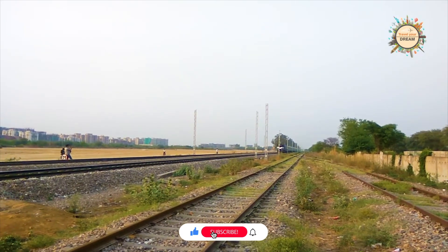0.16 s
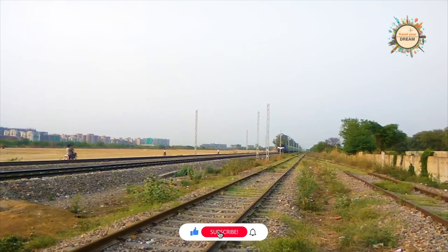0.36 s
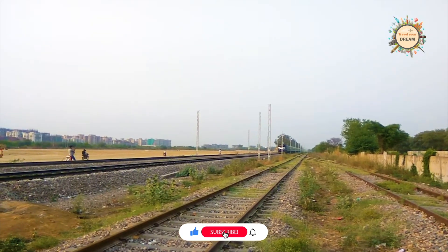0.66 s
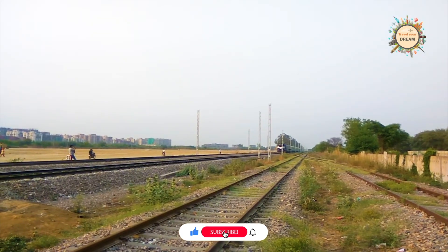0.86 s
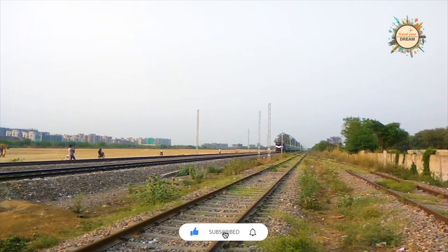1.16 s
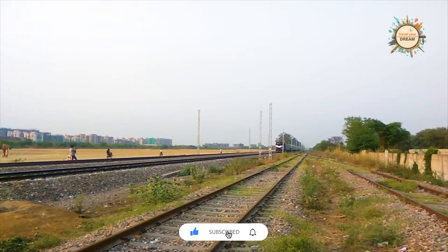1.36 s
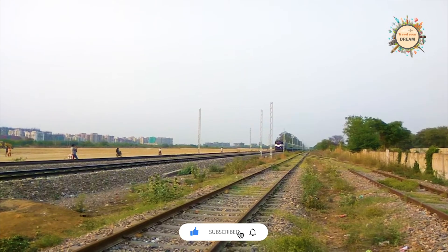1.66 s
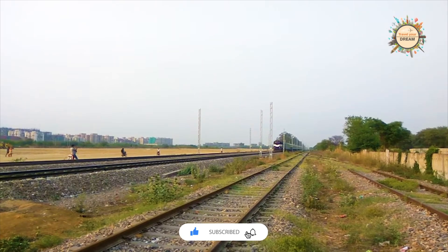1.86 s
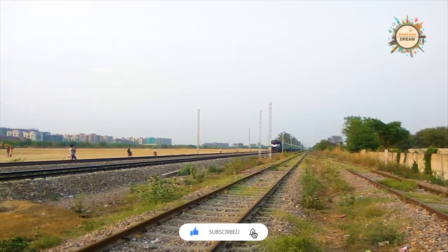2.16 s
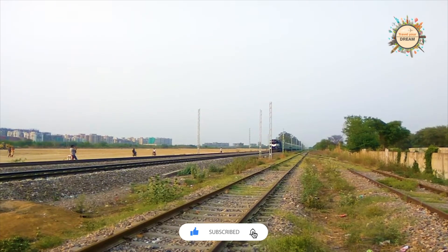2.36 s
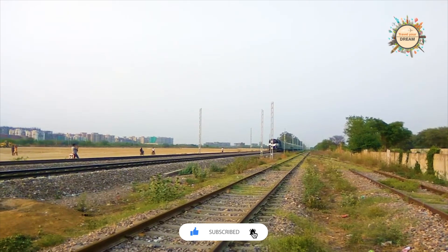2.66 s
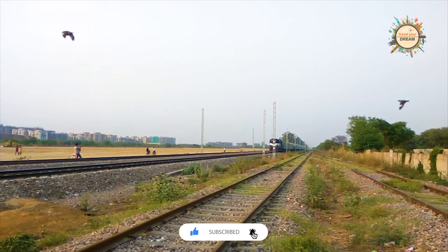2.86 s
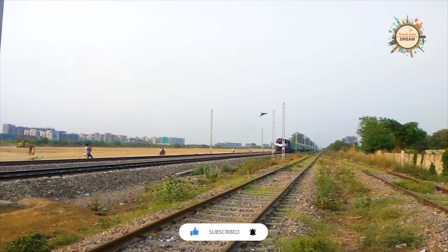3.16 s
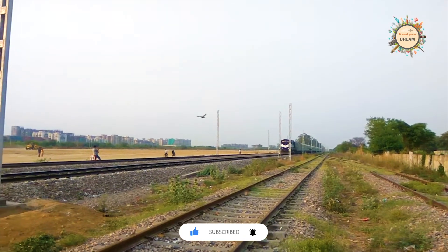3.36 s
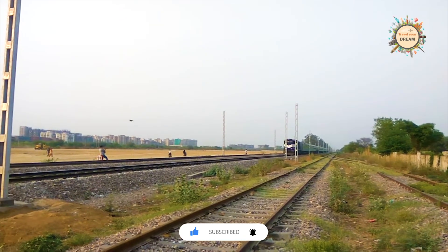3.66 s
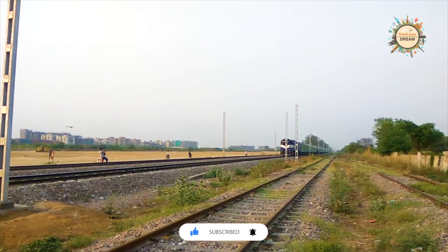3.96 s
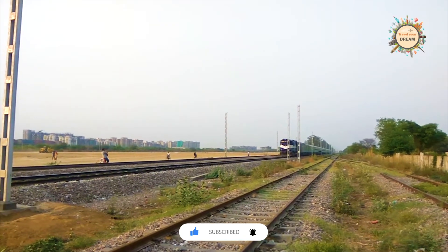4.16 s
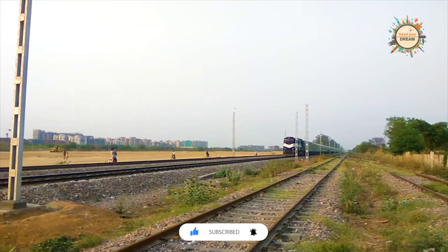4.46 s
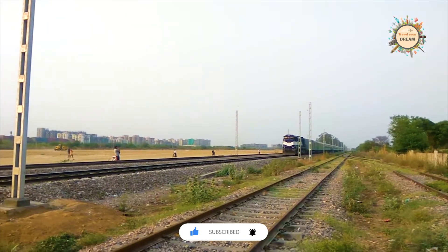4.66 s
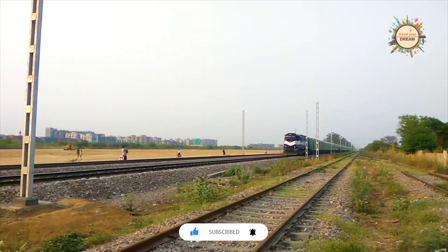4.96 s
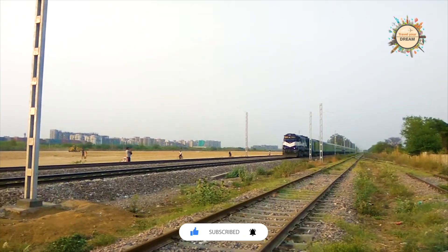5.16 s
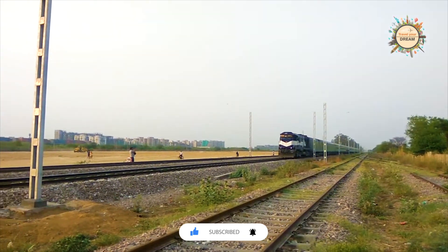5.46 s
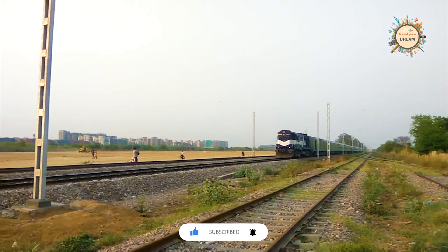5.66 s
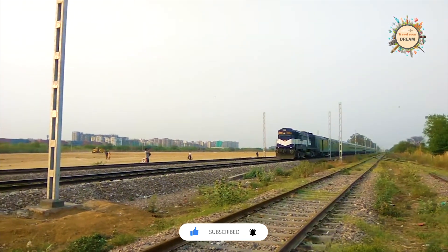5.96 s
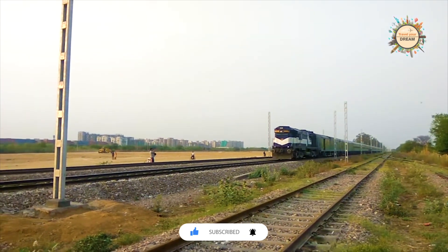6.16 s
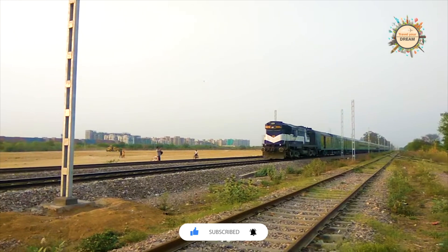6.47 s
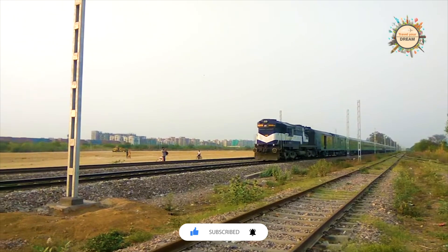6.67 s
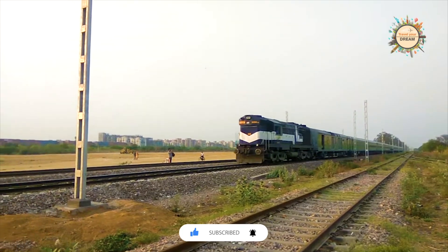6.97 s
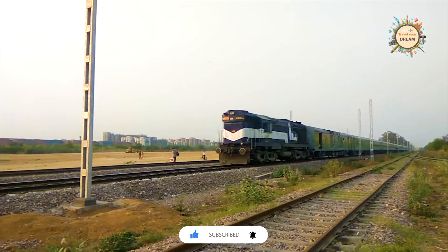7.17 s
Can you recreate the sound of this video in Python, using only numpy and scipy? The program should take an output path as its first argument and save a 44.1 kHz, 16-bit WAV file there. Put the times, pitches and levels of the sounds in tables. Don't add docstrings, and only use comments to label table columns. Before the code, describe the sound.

Quiet open trackside heard by a stereo phone with softened treble. From 0 s, a faint low diesel drone around 80 Hz flutters unevenly over soft rolling rumble, while brief high bird trills and chirps come and go until about 4.3 s. A distant single-note horn, thin and wavering, drifts in from about 0.7 to 3.9 s. One faint wheel knock sounds near 2.7 s. At 4.5 s a loud reedy air horn bursts in, joined at 4.7 s by a lower one a tritone below; the harsh, buzzing, dissonant pair holds with slight shimmer until 6.6 s, stopping abruptly with a short scattered echo. The engine throb has strengthened by then. Rumble and rail roar rise quickly from 6.7 s; from 6.9 s to the end at 7.3 s, hard metallic knocks with dull thuds strike irregularly, and compressed air hisses in, spitting slightly.

```python
import sys
import numpy as np
from scipy import signal
from scipy.fft import rfft, irfft
from scipy.io import wavfile
from scipy.ndimage import uniform_filter1d

SR = 44100
rng = np.random.default_rng(int(sys.argv[2]) if len(sys.argv) > 2 else 0)


def how_loud(loudness_db):
    steps = np.asarray(loudness_db, float) / 20
    return 10 ** steps


def unload_audio(sound):
    columns = np.transpose(np.atleast_2d(sound))
    steps = np.round(np.clip(columns, -1, 1) * 32767)
    wavfile.write(sys.argv[1], SR, steps.astype(np.int16))


N = 321930
T = np.arange(N) / SR
FIRING_HZ = 80.7
FAR_HORN_HZ = 349.6

# time_s, pitch_hz
HIGH_HORN_PITCH = [
    (4.55, 463.3), (4.58, 458.5), (4.63, 456.6), (4.72, 454.5), (5, 455.7), (5.3, 454.8),
    (5.6, 455.1), (5.9, 454), (6.2, 454.4), (6.5, 453)]
LOW_HORN_PITCH = [
    (4.738, 324.6), (4.8, 322.7), (5, 322.5), (5.3, 321.9), (5.6, 320.8), (5.9, 320.7),
    (6.2, 319.5), (6.5, 319.4), (6.64, 321.6), (6.68, 323)]
# time_s, note_db, second_db, third_db, upper_db
HIGH_HORN_LEVELS = [(4.53, -33, -31, -40, -51), (4.545, -25.5, -26, -27, -41.5),
                    (4.56, -24, -20.5, -24, -29.5), (4.6, -24, -22.5, -25.5, -29.5),
                    (4.68, -23.5, -16, -28, -24.5), (4.78, -20.5, -18.5, -24.5, -26),
                    (4.88, -22, -17, -27, -28), (4.98, -22.5, -17.5, -29.5, -27.5),
                    (5.08, -19.5, -19.5, -25.5, -26), (5.18, -20.5, -19.5, -25, -26),
                    (5.28, -18.5, -17, -38, -26), (5.38, -19.5, -18, -24.5, -27),
                    (5.48, -21, -19.5, -29, -27), (5.58, -19, -17, -30.5, -26),
                    (5.68, -22, -20, -26.5, -25), (5.78, -23, -22, -23, -24.5), (5.88, -20, -22, -30, -23),
                    (5.98, -24, -21, -22.5, -24), (6.08, -28, -21, -21.5, -24.5),
                    (6.18, -24, -17, -26, -26.5), (6.28, -31.5, -25, -20.5, -24),
                    (6.38, -23.5, -25, -22.5, -27.5), (6.48, -31.5, -24.5, -22.5, -24),
                    (6.58, -31.5, -26.5, -21, -25), (6.6, -26, -30, -21.5, -25),
                    (6.62, -31, -46, -39, -36.5), (6.65, -48, -43.5, -46, -48), (6.68, -58, -49, -45, -56)]
LOW_HORN_LEVELS = [(4.68, -45, -46, -42, -53.5), (4.71, -37.5, -50, -47, -46.5),
                   (4.74, -27.5, -34.5, -36, -47.5), (4.769, -22, -27.5, -23, -36),
                   (4.81, -23.5, -24.5, -24.5, -30.5), (4.9, -22.5, -25.5, -26.5, -38),
                   (5.01, -23.5, -24, -23.5, -34.5), (5.12, -21.5, -24, -24, -30.5),
                   (5.23, -23.5, -27, -26.5, -39), (5.341, -21.5, -24.5, -24.5, -36),
                   (5.45, -20.5, -27.5, -25, -33), (5.56, -21, -25, -24.5, -32),
                   (5.669, -19, -26, -25.5, -38.5), (5.78, -20, -25, -24, -33.5),
                   (5.891, -21.5, -28, -29.5, -41), (6.0, -21, -25, -25, -33),
                   (6.11, -19.5, -26.5, -31.5, -34), (6.22, -16.5, -29, -28, -31.5),
                   (6.33, -14.5, -28.5, -26.5, -34.5), (6.44, -15.5, -34.5, -27, -28.5),
                   (6.55, -16, -28, -27, -28.5), (6.6, -14.5, -26, -26, -33), (6.629, -17, -44, -43, -45),
                   (6.659, -25, -59, -50, -42), (6.7, -41, -58, -51.5, -56), (6.74, -49, -51, -60, -57)]
HIGH_HORN_BELL = [-8.5, -7.5, -7.5, -11, -9, -17, -13, -17, -17.5, -20.5, -24, -34.5, -40, -46, -48, -43,
                  -42.5, -51.5]
LOW_HORN_BELL = [-0.5, 2.5, -9, -12, -11.5, -18, -13, -17, -12, -24, -18.5, -19, -28, -32.5, -29.5, -33,
                 -27.5, -37.5]
# time_s, level_db
EXHAUST_LEVELS = [(0.0, -48), (0.04, -37.5), (0.08, -47.5), (0.36, -49), (0.43, -41), (0.61, -47.5),
                  (0.73, -40), (0.77, -59), (0.91, -43), (1.22, -54), (1.26, -39), (1.38, -51), (1.42, -35),
                  (1.61, -45), (1.85, -37.5), (2.03, -54), (2.09, -37), (2.88, -37), (2.91, -43.5),
                  (3.36, -42), (3.39, -56), (3.5, -36), (3.84, -39), (3.94, -33.5), (4.33, -34.5),
                  (4.37, -46), (4.41, -33), (4.47, -38.5), (4.51, -33), (4.78, -46.5), (4.84, -42.5),
                  (4.94, -53.5), (5.0, -44.5), (5.08, -47), (5.26, -33.5), (5.47, -40.5), (5.71, -49),
                  (5.75, -35), (5.81, -32), (5.9, -54.5), (5.94, -39), (6.08, -33.5), (6.12, -39),
                  (6.22, -28), (6.32, -32), (6.4, -25.5), (6.44, -34.5), (6.51, -28.5), (6.57, -34),
                  (6.65, -33.5), (6.69, -47), (6.77, -28.5), (6.85, -37.5), (6.91, -27), (7.01, -27.5),
                  (7.05, -39.5), (7.14, -27.5), (7.3, -38.5)]
CYLINDER_LEVELS = [0, -6, -0.5, -6]
# time_s, rumble_db, rail_roar_db, hiss_db, leaves_db
GEAR_BEFORE_HORNS = [
    (0.0, -50, -53.5, -60, -75.5), (0.25, -50.5, -52, -60.5, -75), (0.43, -53.5, -54.5, -61.5, -72),
    (0.56, -48.5, -54, -60.5, -70.5), (0.71, -46.5, -51, -61, -72.5), (0.91, -49, -55, -63, -74),
    (1.14, -46.5, -55, -58.5, -71), (1.27, -47, -52, -57.5, -71.5), (1.34, -46, -54.5, -59, -70.5),
    (1.48, -46.5, -53, -61, -70), (1.68, -47, -53.5, -59.5, -78.5), (1.84, -48.5, -53.5, -59.5, -74.5),
    (2.07, -48.5, -55.5, -60.5, -77), (2.24, -47, -53.5, -58.5, -78), (2.52, -51, -55.5, -65, -77),
    (2.68, -49, -51, -58.5, -71.5), (2.84, -50.5, -53, -59, -69.5), (3.03, -48.5, -52, -61.5, -70.5),
    (3.57, -49, -55, -61, -67.5), (3.71, -49.5, -55.5, -59, -73), (3.97, -45.5, -52, -55.5, -70.5),
    (4.14, -47, -49.5, -57.5, -67), (4.5, -48.5, -49.5, -55.5, -67.5)]
GEAR_AFTER_HORNS = [
    (6.72, -40.5, -54, -52, -69), (6.914, -42, -42.5, -51.5, -66), (7.08, -39, -38.5, -48.5, -64)]
GEAR_DRAWING_LEVEL = [(7.14, -37, -37.5, -47, -62.5), (7.26, -36.5, -35, -49, -61),
                      (7.3, -34, -41, -50.5, -62.5)]
# freq_hz, level_db
GEAR_SPECTRUM = [(25, -30), (45, -9.5), (110, -12), (200, -18), (330, -18.5), (560, -27), (880, -22.5),
                 (1200, -31), (1700, -33.5), (2800, -35.5), (3150, -40), (4700, -42), (6300, -47.5),
                 (7500, -71)]
# start_s, peak_db, ring_hz
WHEEL_KNOCKS = [
    (2.689, -40, 920),
    (6.927, -26, 828.3),
    (6.997, -19.5, 876.3),
    (7.083, -25, 920.3),
    (7.124, -21, 854),
    (7.177, -28, 829),
    (7.238, -20, 850),
]
# time_s, level_db
VENT_LEVELS = [(7.02, -50), (7.052, -56), (7.16, -37.5), (7.204, -39), (7.254, -36.5), (7.3, -36.5)]
# freq_hz, density_db_per_hz
VENT_SPECTRUM = [(880, -38.5), (1500, -2), (1830, -15), (2340, 0), (2810, -7.5), (3160, -21), (3710, -3.5),
                 (4090, -11), (5400, -1), (7040, -8), (9150, -43.5), (15500, -120)]
# time_s, level_db
FAR_HORN_LEVELS = [(0.7, -57.5), (1.05, -54), (1.14, -45), (1.62, -45), (2.07, -51.5), (2.29, -46),
                   (2.4, -49), (2.58, -81), (2.66, -55), (3.03, -65), (3.19, -49.5), (3.54, -64),
                   (3.61, -56.5), (3.9, -64.5)]
# start_s, length_s, first_hz, last_hz, level_db, trill_hz
BIRD_CALLS = [(0.024, 0.059, 3350, 3270, -65, 33), (0.229, 0.078, 4700, 4500, -61.5, 26),
              (0.421, .13, 4610, 4040, -57, 45), (0.662, 0.11, 4670, 4050, -54, 45),
              (1.089, 0.064, 4600, 4900, -60, 30), (1.2, 0.094, 4800, 4700, -64.5, 20),
              (1.22, 0.046, 3600, 3380, -66, 20), (1.3, .08, 2700, 2570, -61, 30),
              (1.397, 0.053, 5540, 4000, -63, 29), (1.806, 0.024, 6000, 4700, -62, 20),
              (1.88, 0.022, 6200, 4800, -64, 20), (2.17, 0.08, 3650, 3200, -57.5, 30),
              (2.24, 0.073, 2900, 2410, -60, 30), (2.63, .04, 5300, 4800, -65, 22),
              (2.678, .05, 3810, 3740, -54.5, 15), (2.74, 0.054, 3500, 3350, -62, 20),
              (3.05, 0.055, 5050, 4200, -59, 26), (3.063, 0.093, 4000, 3900, -61, 19),
              (3.48, .04, 4000, 3950, -64, 20), (3.3, .1, 5570, 5400, -67, 30),
              (3.902, 0.17, 2600, 2410, -63, 30), (2.5, .05, 2500, 2300, -67, 20),
              (2.079, .15, 5180, 5530, -70, 30), (.4, .04, 3500, 3440, -65, 20),
              (4.149, .09, 6170, 5470, -62, 40), (4.29, 0.046, 6500, 5530, -62, 30)]
# freq_hz, left_minus_right_db
PORT_BALANCE = [(200, 0.5), (650, -2.5), (950, -1.5), (1350, -8), (1800, 3.5), (2300, 4), (2750, -5.5),
                (3200, 4.5), (3900, 11), (4800, 7), (6500, 5.5)]
# freq_hz, left_lead_rad
PORT_PHASE = [(0, 0), (1120, 0.34), (1460, 2), (1890, 5), (2240, 7.5), (2840, 6.9), (3100, 8.5),
              (3360, 8.5), (3620, 8), (4050, 7), (5000, 8.5), (5430, 8), (6370, 8.5), (6720, 5.5)]


def set_rms(x, db):
    return x * how_loud(db) / np.sqrt(np.mean(x ** 2))


def curves(table):
    time_s, *columns = np.transpose(table)
    return [np.interp(T, time_s, c) for c in columns]


def walk(rate_hz, size=N):
    draws = rng.standard_normal(int(size * rate_hz / SR) + 2)
    steps = uniform_filter1d(np.repeat(draws, 4), 4)
    return 1.19 * np.interp(np.arange(size) * 4 * rate_hz / SR, np.arange(len(steps)), steps)


def colour(x, points):
    hz, db = np.transpose(points)
    gain_db = np.interp(np.log(np.fft.rfftfreq(N, 1 / SR) + 1), np.log(hz), db)
    return irfft(rfft(x) * how_loud(gain_db), N)


def band(x, lo_hz, hi_hz):
    return signal.sosfilt(signal.butter(2, [lo_hz, hi_hz], "band", fs=SR, output="sos"), x)


def port_gains(hz):
    balance_db = np.interp(hz, *np.transpose(PORT_BALANCE))
    lead_rad = np.interp(hz, *np.transpose(PORT_PHASE))
    half = how_loud(balance_db / 2) * np.exp(.5j * lead_rad)
    return np.array([half, 1 / half]) / np.sqrt((abs(half) ** 2 + abs(half) ** -2) / 2)


def ports(x):
    return irfft(rfft(x) * port_gains(np.fft.rfftfreq(N, 1 / SR)), N)


def horn(pitch, table, bell_db, start_s, rise_s, shimmer_db, skirt_db, air_db, off_axis_db):
    end_s = table[-1][0]
    on = (T > start_s) & (T < end_s)
    size = on.sum()
    hz = curves(pitch)[0][on]
    levels_db = [c[on] for c in curves(table)]
    partials_db = levels_db[:3] + [levels_db[3] + b for b in bell_db]
    turn = np.exp(2j * np.pi * np.cumsum(hz) / SR)
    out, partial = np.zeros((2, N)), 1
    for k, partial_db in enumerate(partials_db, 1):
        partial = partial * turn * np.exp(-.35j * k)
        height = min(k * hz[0] / 2200, 1)
        slow_db = shimmer_db * height * ((k > 3) * walk(7.005, size=size) + 0.93 * walk(35, size=size))
        slow_db -= off_axis_db * np.clip(k * hz[0] / 4000 - 1, 0, 1) * (T[on] - start_s - 1)
        fray = how_loud(skirt_db) * (0.23 + height) * (walk(250, size=size) + 1j * walk(250, size=size))
        lean = np.exp(height * (0.26 * walk(8, size=size) + .3j * walk(9.94, size=size)))
        wave = np.sqrt(2) * how_loud(partial_db + slow_db) * (1 + fray) * partial
        gains = port_gains(k * hz.mean())[:, None]
        out[:, on] += np.real(gains * wave * np.array([lean, 1 / lean]))
    air = np.zeros(N)
    air[on] = how_loud(levels_db[3] + air_db) * (1 + .4 * turn.real) * rng.standard_normal(size)
    opening = np.clip(np.minimum((T - start_s) / rise_s, (end_s - T) / 0.04), 0, 1)
    return (out + ports(band(air, 400, 3900))) * opening


def exhaust():
    rate_hz = FIRING_HZ * (1 + 0.0525 * walk(40))
    cycle = np.floor(np.cumsum(rate_hz) / SR).astype(int)
    count = N // 100
    firing_db = np.resize(CYLINDER_LEVELS, count) + 4.35 * rng.standard_normal(count)
    pulses = np.diff(cycle, prepend=0) * how_loud(firing_db)[cycle]
    boom = set_rms(band(band(pulses, 62, 105), 52, 120), 0)
    overtone = set_rms(band(band(pulses, 150, 180), 140, 190), -19.5)
    return (boom + overtone) * how_loud(curves(EXHAUST_LEVELS)[0] - 0.5)


def running_gear():
    hz, time_s, noise = signal.stft(rng.standard_normal((3, N)), SR, nperseg=1024)
    frames = np.minimum(time_s * SR, N - 1).astype(int)
    place, centres = np.log2(hz + 1), np.arange(4.5, 13.5, .5)
    flicker = np.array([(1.27 * walk(14) + .16 * octave * walk(2.97))[frames] for octave in centres])
    flicker = flicker + 0.65 * walk(4.23)[frames]
    gear = curves(GEAR_BEFORE_HORNS + GEAR_AFTER_HORNS + GEAR_DRAWING_LEVEL)
    nearing = np.array([c[frames] - c[0] for c in gear])
    gear_place = np.log2([220, 800, 2200, 6000])
    columns = []
    for flicker_db, nearing_db in zip(flicker.T, nearing.T):
        columns.append(np.interp(place, centres, flicker_db) + np.interp(place, gear_place, nearing_db))
    spectrum_hz, spectrum_db = np.transpose(GEAR_SPECTRUM)
    db = np.array(columns).T + np.interp(place, np.log2(spectrum_hz), spectrum_db)[:, None]
    share = np.clip(hz / 1000, .13, .7)[:, None]
    mix = np.array([np.sqrt(1 - share ** 2), share, share])
    near, left, right = signal.istft(noise * how_loud(db) * mix, SR, nperseg=1024)[1][:, :N]
    return how_loud(-12) * (ports(near) + np.array([left * how_loud(2.0), right]))


def knocks():
    out, t = np.zeros(N + SR), T[:SR // 8]
    thud = 0.45 * np.sin(2 * np.pi * 170 * t) * np.exp(-t / 0.011)
    for start_s, peak_db, ring_hz in WHEEL_KNOCKS:
        ring = np.sin(2 * np.pi * ring_hz * t) * np.exp(-t / 0.0063)
        i = int(start_s * SR)
        out[i:i + len(t)] += how_loud(peak_db) * (ring + thud) * np.minimum(t / 0.0014, 1)
    return out[:N]


def vent():
    noise = set_rms(colour(rng.standard_normal((2, N)), VENT_SPECTRUM), 0) * how_loud(1.5 * walk(37))
    side_db = np.array([[5.0], [0.5]])
    opening = np.clip((T - VENT_LEVELS[0][0]) / .05, 0, 1)
    return how_loud(curves(VENT_LEVELS)[0] + side_db) * noise * opening


def echoes(x):
    t = T[:SR // 2]
    decay = np.exp(-t / 0.017) + 0.16 * np.exp(-t / .15)
    tail = rng.standard_normal((2, len(t))) * decay * np.minimum(t / 0.0013, 1)
    return how_loud(-44.5) * signal.fftconvolve(x[None], tail)[:, :N]


def far_horn():
    phase = 2 * np.pi * np.cumsum(FAR_HORN_HZ + 1.63 * walk(15)) / SR
    level_db = curves(FAR_HORN_LEVELS)[0] + 2.3 * walk(20)
    first_s, last_s = FAR_HORN_LEVELS[0][0], FAR_HORN_LEVELS[-1][0]
    gate = np.clip(np.minimum(T - first_s, last_s - T) / 0.062, 0, 1)
    return np.sqrt(2) * how_loud(level_db) * np.sin(phase) * gate


def birds():
    out = np.zeros(N)
    for start_s, length_s, first_hz, last_hz, level_db, trill_hz in BIRD_CALLS:
        t = T[:int(length_s * SR)]
        trill = 2 * np.pi * trill_hz * t
        hz = first_hz + (last_hz - first_hz) * t / length_s + 250 * np.sin(trill) * trill_hz / 45
        fray = 1 + 1.3 * np.interp(t, t[::60], rng.standard_normal(len(t[::60])))
        swell = np.sin(np.pi * t / length_s) * (1 - .5 * np.cos(trill))
        whistle = np.sin(2 * np.pi * np.cumsum(hz) / SR)
        i = int(start_s * SR)
        out[i:i + len(t)] += how_loud(level_db) * swell * fray * whistle
    smear = rng.standard_normal((2, SR // 5)) * np.exp(-T[:SR // 5] / 0.05) * how_loud(-32)
    smear[:, 0] = 1
    return signal.fftconvolve(out[None], smear)[:, :N] * how_loud(np.array([[5.0], [0.5]]))


def scene():
    high = horn(HIGH_HORN_PITCH, HIGH_HORN_LEVELS, HIGH_HORN_BELL, start_s=4.536, rise_s=0.019,
                shimmer_db=3.0, skirt_db=-17, air_db=-16.5, off_axis_db=8)
    low = horn(LOW_HORN_PITCH, LOW_HORN_LEVELS, LOW_HORN_BELL, start_s=4.68, rise_s=0.036,
               shimmer_db=3.0, skirt_db=-17.5, air_db=-12.5, off_axis_db=6)
    train = high + low + ports(knocks())
    distant = ports(far_horn() + exhaust())
    return train + distant + echoes(train.mean(axis=0)) + running_gear() + vent() + birds()


def low_pass(x):
    return signal.sosfilt(signal.butter(12, 10100, fs=SR, output="sos"), x)


def record(dry):
    rounded = np.tanh(1.239 * dry) / 1.155
    mic = colour(rounded, [(30, -16), (50, -0.5), (5500, -0.5), (6600, -3.5), (7300, -10.5),
                           (10000, -15), (10500, -35.5)])
    return low_pass(mic)


dry = scene()
out = record(dry)
unload_audio(out)
```